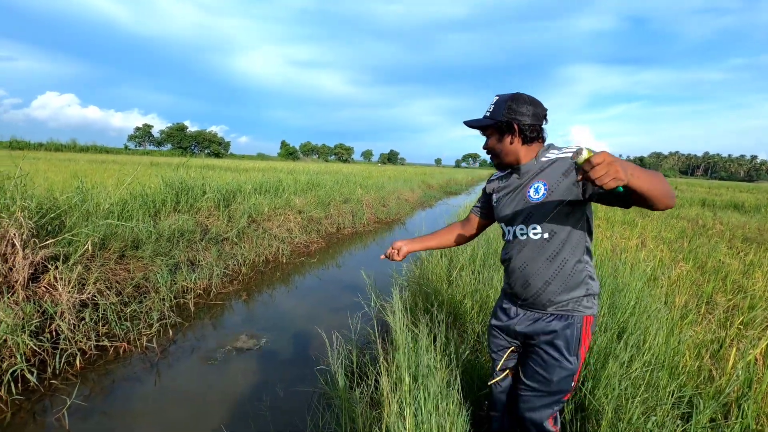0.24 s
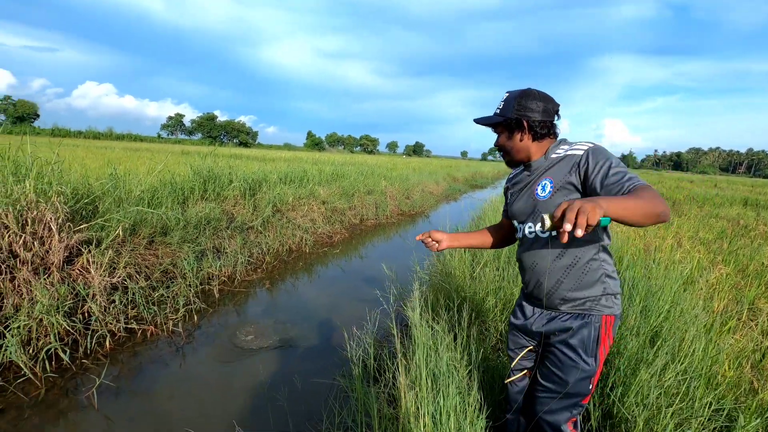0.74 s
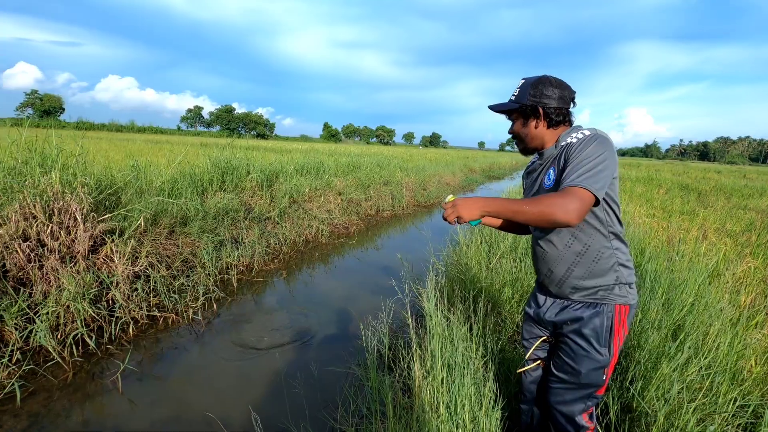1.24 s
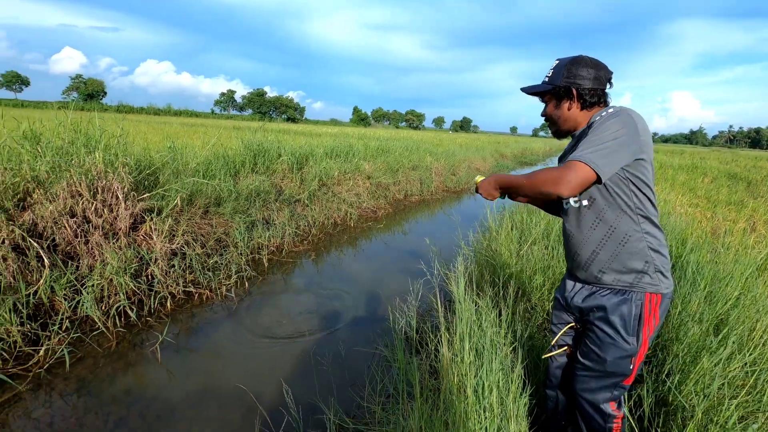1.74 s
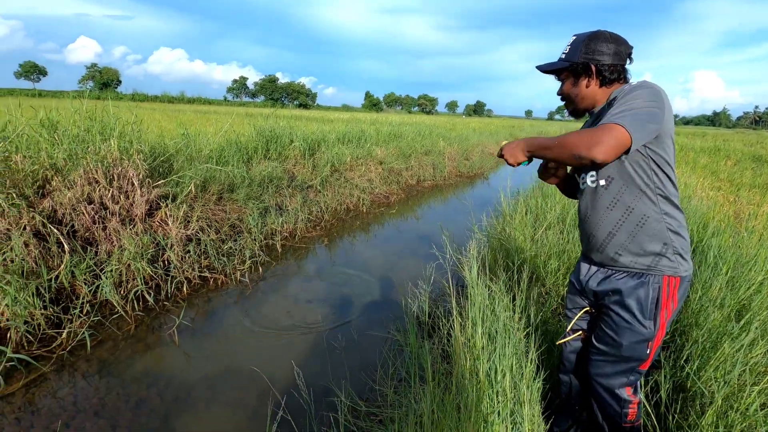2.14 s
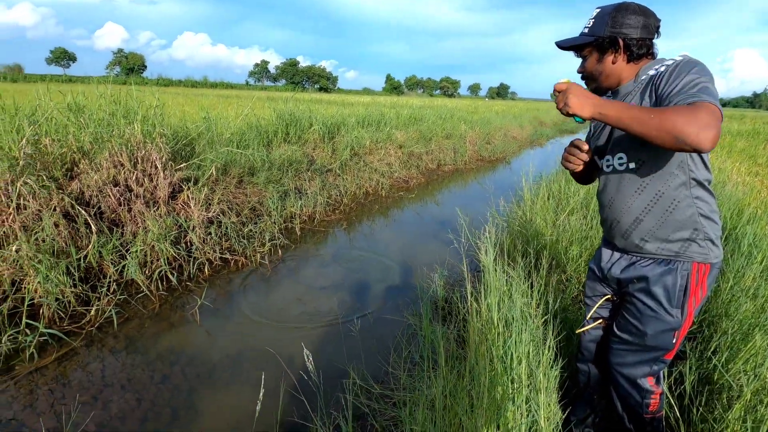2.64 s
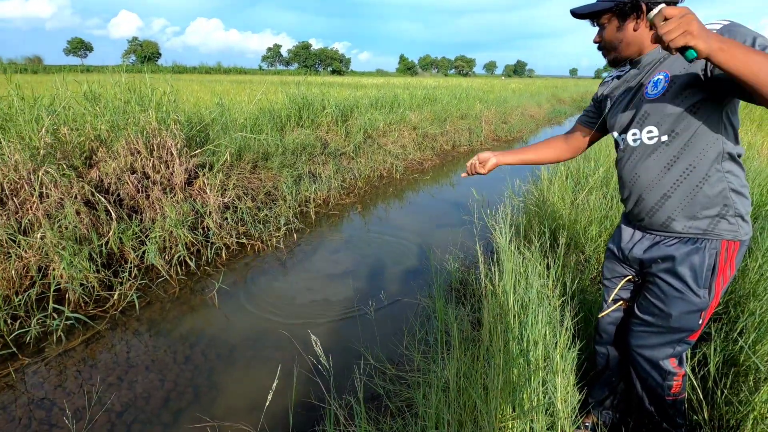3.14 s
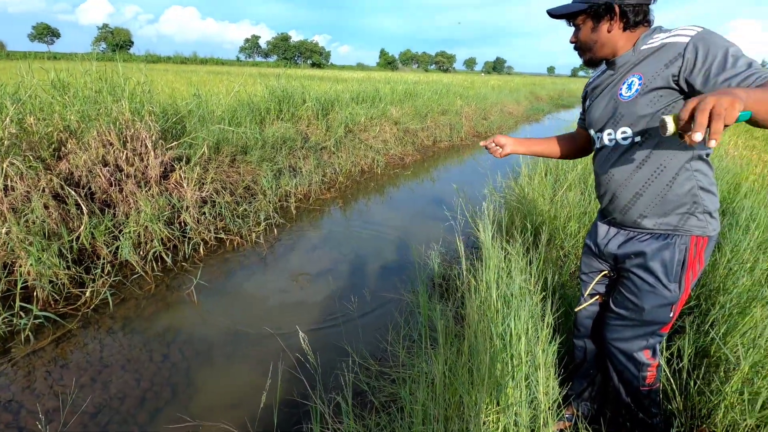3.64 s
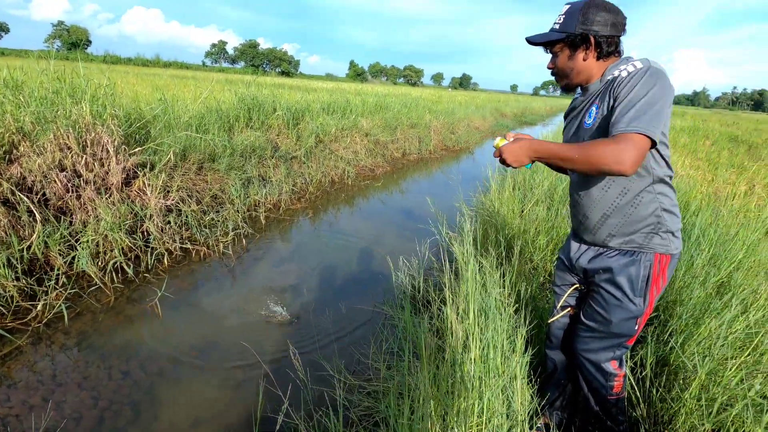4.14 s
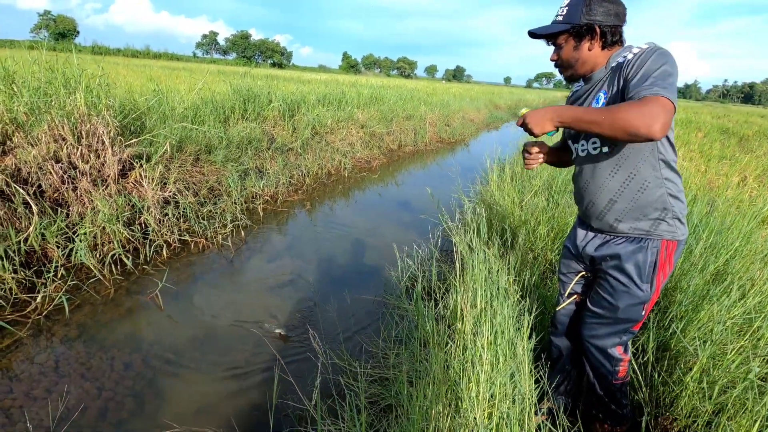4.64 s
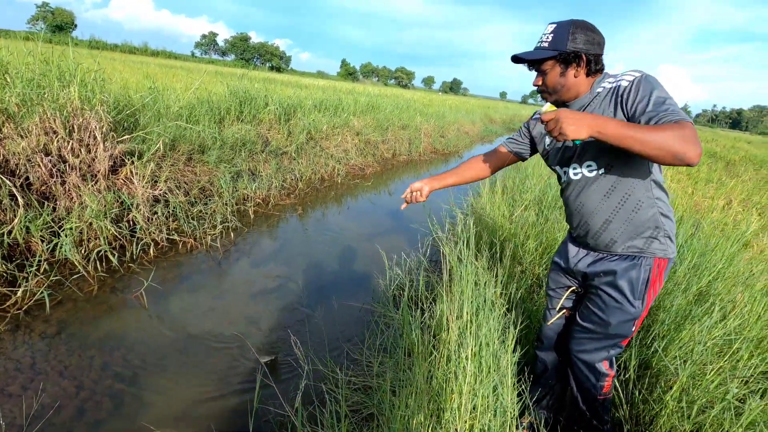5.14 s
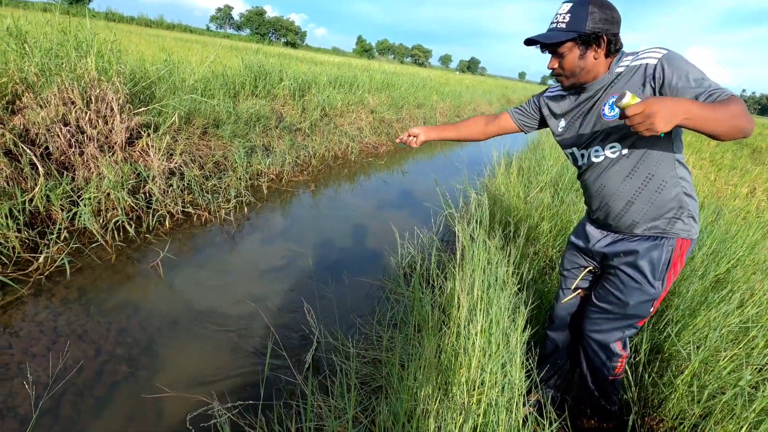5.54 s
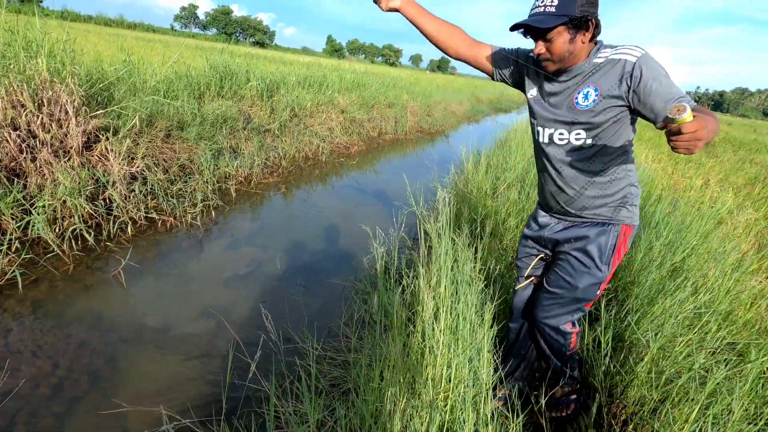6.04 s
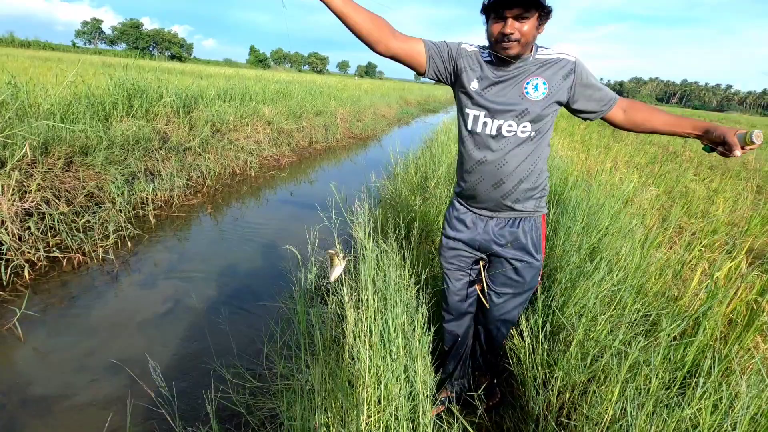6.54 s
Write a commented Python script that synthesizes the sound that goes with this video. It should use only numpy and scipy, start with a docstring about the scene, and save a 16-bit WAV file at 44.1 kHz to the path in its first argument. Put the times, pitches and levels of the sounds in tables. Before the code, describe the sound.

An open paddy field, heard by a stereo microphone near a ditch: a quiet distant wash and a thin, buzzing high insect hiss throughout. From 0 to 0.9 s a line dragged through water swishes and splashes, with ringing bubbles, rising gulps and bright drop ticks, the sharpest around 0.5 s. A low hum throbs unevenly beneath until about 2.5 s. A faint whistle comes at 1.4 s; from 1.5 s a distant warbler repeats a rapid five-note gliding chirp roughly every 0.3 s, growing clearer. Another bird trills at 2.2 s. From 2.6 s wind rumbles and flutters, slapping one side or the other, with dense jolts at 3.4-4 s and a heavy thump near 4.5 s. A smaller splash gurgles and drips at 3.9-4.8 s. Light wet swishes and ticks follow near 5.5-6.6 s, then a brief whistle and a short, hollow, raspy frog croak from 6.6 s to about 6.8 s.

```python
"""A low hum throbs under a hissing band of insects and the far wash of an open paddy field, while a line pulled
through a ditch splashes: noise swishes, ringing bubbles, gliding gulps, ticking drops. From 1.5 s a warbler
repeats a five-note phrase of gliding tones; other birds whistle briefly near 1.4, 2.2 and 6.6 s. From 2.6 s
wind buffets the two microphone ports with low noise and single jolts; the line splashes again near 4 s.
At the end a frog croaks: noisy pulses through throat resonances."""
import sys
import numpy as np
from scipy import signal
from scipy.fft import rfft, irfft, next_fast_len
from scipy.io import wavfile
from scipy.ndimage import uniform_filter1d

SR = 44100
rng = np.random.default_rng(int(sys.argv[2]) if len(sys.argv) > 2 else 0)


def output_pcm(signal):
    """Save a mono or channel-first signal as 16-bit PCM at the path in sys.argv[1].

    Samples are clipped to [-1, 1] before scaling.
    """
    pcm = np.clip(np.atleast_2d(signal).T, -1, 1) * 32767
    wavfile.write(sys.argv[1], SR, np.round(pcm).astype(np.int16))


N = 299781  # samples
BIN_HZ = np.fft.rfftfreq(1024, 1 / SR)[:, None]
FRAME_S = np.arange(N // 256 + 5) * 256 / SR

# Phase between the ports for field and water. Each row: frequency in Hz, lead of the left port in radians.
PORT_LEAD = [(60, 0.03), (130, -0.7), (350, -0.76), (1500, -0.73), (3000, -0.4), (6000, -1), (15000, -2)]
# Level between the ports for field and water. Each row: frequency in Hz, left minus right in dB.
PORT_LEAN = [(60, 4.4), (190, 0.89), (500, 0.14), (1000, 1.55), (2200, 4.1), (3700, 4.9), (6000, 0.76),
             (12000, 0.46)]


def gain_of(db):
    """Decibels to amplitude."""
    return 10 ** (np.asarray(db) / 20)


def evened(x, axis=None):
    """Scales to rms 1."""
    return x / np.sqrt(np.mean(abs(x) ** 2, axis=axis, keepdims=True) + 1e-20)


def read(points, hz):
    """Reads a table on a log-frequency axis."""
    f, value = np.transpose(points)
    return np.interp(np.log(hz + 1), np.log(f + 1), value)


def add(mix, start_s, sound):
    """Mixes a sound in at start_s."""
    part = mix[round(start_s * SR):][:len(sound)]
    part += sound[:len(part)]


def smoothed_twice(x, size, axis=-1):
    """Two passes of a moving average."""
    return uniform_filter1d(uniform_filter1d(x, size, axis=axis), size, axis=axis)


def filtered(x, gain):
    """Multiplies the spectrum of x by gain(Hz)."""
    size = next_fast_len(N + 1024)
    spectrum = rfft(x, size) * gain(np.fft.rfftfreq(size, 1 / SR))
    return irfft(spectrum, size)[..., :N]


def coloured(x, points):
    """Gives x the spectrum of a (Hz, dB) table, at rms 1."""
    return evened(filtered(x, lambda hz: gain_of(read(points, hz))))


def resonate(x, hz, width_hz):
    """A resonance of gain 1: shifts hz to 0, applies two one-pole low-passes, shifts back."""
    turn = np.exp(2j * np.pi * hz * np.arange(len(x)) / SR)
    r = np.exp(-np.pi * width_hz / SR)
    return 2 * (turn * signal.lfilter([(1 - r) ** 2], [1, -2 * r, r * r], x / turn)).real


def drift(per_s):
    """Random wander of rms 1: 24 sines of random phase, up to per_s wiggles a second."""
    hz = np.geomspace(per_s / 20, per_s, num=24)[:, None]
    coarse_s = np.arange(0, N + 64, 64) / SR
    wiggle = (np.sin(2 * np.pi * (hz * coarse_s + rng.random(hz.shape))) / np.sqrt(hz)).sum(0)
    return np.interp(np.arange(N) / SR, coarse_s, evened(wiggle))


def noise(size, same, patchy_db):
    """Two channels of random short-time spectra of magnitude size and likeness same, with drifting patches."""
    a, b, c, d, patches = rng.standard_normal((len(FRAME_S), len(BIN_HZ), 5)).T
    patches = uniform_filter1d(patches, size=12, axis=0)  # over frequency
    patches = evened(uniform_filter1d(patches, size=10, axis=1))  # over time
    same = np.clip(same, -1, 1)
    left = a + 1j * b
    right = same * left + np.sqrt(1 - same ** 2) * (c + 1j * d)
    z = np.array([left, right]) * gain_of(patchy_db * patches)
    sound = signal.istft(z * evened(size, axis=0), nperseg=1024, noverlap=768)[1]
    return sound[:, :N] / np.sqrt(len(BIN_HZ))


def swells(t, peak_s, db, rise_s, fall_s, dome=1):
    """One envelope a row: 20 dB up over rise_s to its peak, 20 dB down over fall_s; signs of times ignored."""
    late = t - np.asarray(peak_s)[:, None]
    span = np.where(late < 0, np.asarray(rise_s)[:, None], np.asarray(fall_s)[:, None])
    drop_db = 20 * (abs(late) / (abs(span) + 0.00092)) ** dome
    return gain_of(np.asarray(db)[:, None] - np.minimum(drop_db, 200))


def summed(rows):
    """Adds envelopes by power and reads them at every sample."""
    return np.interp(np.arange(N) / SR, FRAME_S, np.sqrt((rows ** 2).sum(0)))


def random_hits(per_s, spread_db):
    """Sparse impulses at random times, with random levels up to 3 * spread_db."""
    level = gain_of(spread_db * np.minimum(rng.exponential(1, N), 3))
    return level * (rng.random(N) < per_s / SR)


def ports(x, lead, lean):
    """A source reaches the two ports with another phase and level, split evenly between them."""
    def gain(hz):
        half = gain_of(read(lean, hz) / 2) * np.exp(.5j * read(lead, hz))
        return half ** [[1], [-1]]
    return filtered(x, gain)


def scatter(x, t60_s):
    """Sparse echoes off banks and stems, other ones for each port."""
    taps = np.zeros((2, SR // 2))
    at = np.arange(300, SR // 2 - 20, 20) + rng.integers(0, 20, (2, (SR // 2 - 301) // 20))
    np.put_along_axis(taps, at, rng.choice([-1., 1.], at.shape), 1)
    taps *= gain_of(-60 * np.arange(SR // 2) / SR / t60_s)
    return signal.fftconvolve(x[None], taps / np.linalg.norm(taps[0]), axes=1)[:, :N]


def field():
    """Steady far wash and leaves as shaped noise; insects as narrow noise that buzzes fast, throbs slowly."""
    # Each row: frequency in Hz, spectrum in dB per Hz.
    wash_spectrum = [(8.2, -51), (14, -17), (30, -16), (45, -3), (69, -4.5), (127, -10), (157, -12),
                     (291, -26.5), (607, -43), (1090, -40.5), (1430, -39.5), (2030, -39), (5700, -47.5),
                     (8860, -42), (16000, -126)]
    # Each row: frequency in Hz, left-right likeness 0-1.
    wash_likeness = [(60, 1), (130, 0.83), (300, 0.55), (700, 0.052), (3000, 0.074), (8000, 0.15),
                     (15000, 0.044)]
    wash_db = -50  # of the part above 130 Hz, ahead of the ports
    insect_hz, insect_width_hz, insect_db = 8960, 810, -63.5
    flat = np.ones((len(BIN_HZ), len(FRAME_S)))
    wash = coloured(noise(flat, read(wash_likeness, BIN_HZ), patchy_db=2.0), wash_spectrum)
    above = signal.sosfilt(signal.butter(2, 130, "high", fs=SR, output="sos"), wash)
    buzz = 1 + 0.16 * np.sin(2 * np.pi * np.cumsum(122 + 4 * drift(1.1)) / SR)
    throb = 1 + .2 * np.sin(2 * np.pi * np.cumsum(8.1 + .8 * drift(1.5)) / SR)
    a, b = [evened(resonate(v, insect_hz, insect_width_hz)) for v in rng.standard_normal((2, N))]
    hiss = np.array([a, 0.82 * b - 0.3 * a])  # the ports hear the swarm partly in opposite phase
    insects = gain_of(insect_db + np.array([[3.5], [-3.5]])) * hiss * buzz * throb
    return ports(wash * gain_of(wash_db) / np.std(above), PORT_LEAD, PORT_LEAN) + insects


def hum():
    """A low sine that wavers in pitch and throbs in level."""
    # Each row: peak in seconds, peak level in dB, mean pitch in Hz, seconds to rise and to fall by 20 dB.
    throbs = [(0.178, -39.5, 64.9, -0.46), (.35, -31, 62, 0.04), (.55, -35, 65.96, 0.15),
              (0.729, -31.5, 62.1, 0.05), (.82, -35, 62.5, 0.1), (0.944, -30, 60.2, 0.03),
              (1.06, -44, 66, 1.1), (1.18, -28, 66.64, 0), (1.3, -46.5, 66.14, 1.4), (1.5, -56, 58.4, -2),
              (1.635, -40.5, 61, -0.33), (1.74, -37, 59.5, -0.26), (1.9, -42, 61.9, 0.1),
              (2.07, -58.5, 62.3, 3), (2.24, -44.5, 59.6, 0.15), (2.319, -32.5, 63.8, 0.04),
              (2.53, -32.5, 58.9, 0.04)]
    s, db, hz, span_s = np.transpose(throbs)
    wavering_hz = np.interp(np.arange(N) / SR, s, hz) + 7 * drift(16)
    tone = np.sin(2 * np.pi * np.cumsum(wavering_hz) / SR)
    return np.sqrt(2) * summed(swells(FRAME_S, s, db, span_s, span_s)) * tone


def swish():
    """Grass and water: noise with a body and a hiss a swish; fine droplets crackle in it where water splashes."""
    # Each row: peak in seconds, peak level in dB, seconds to rise by 20 dB, seconds to fall by 20 dB,
    # body centre in Hz, body width in octaves, hiss over body in dB, droplet crackle 0-1.
    swishes = [(.03, -47.5, 4, 0.66, 2000, 0.93, -1, 0.16), (.288, -48, 0.14, -0.26, 1170, 0.73, -12, 0.1),
               (.55, -52, 1.2, 0.32, 1800, 1, -7, 0.3), (.87, -62, 1, 1.2, 1480, 0.53, -25, 0),
               (2.76, -64, 0.5, 0.5, 1370, 0.84, -16, 0.45),
               (3.3, -59.5, 0.16, 1.3, 1340, 0.98, -0.5, 0.47), (3.52, -50, 0.19, 0.3, 1060, 0.78, 0, .1),
               (3.96, -54.5, 0.21, -1.3, 1350, 0.68, -9, 0.75),
               (4.15, -53, 0.02, 0.08, 2030, 0.77, -11, 0.6),
               (4.337, -47.5, 0.07, 0.1056, 1540, 1, -1, 0.7), (4.47, -57, 0.03, 0.56, 1510, 1, -2.5, 0.7),
               (4.58, -56.5, 0.2, 0.07, 2570, .25, -15, 0.5), (4.77, -55, 0, 0.16, 2510, 0.27, -15, 0.6),
               (4.808, -54.5, 0.25, 0.32, 1190, 0.58, -0.5, 0.2), (5.0, -62, 0, 0.3, 1270, 0.44, -21, 0.36),
               (5.944, -51, 0, 0.8, 2640, 0.73, -9, 0.3), (6.05, -50.5, 0.23, 0.36, 2090, 0.38, -13, 0.1),
               (6.3, -61, 0.58, 0.5, 2070, 1, 7, 0.5), (6.68, -60.5, 1.1, 0, 1500, 0.76, 1, 0.7),
               (5.58, -66, 0.3, 0.4, 1400, .3, -20, 0.7)]
    # Each row: frequency in Hz, hiss spectrum in dB per Hz.
    hiss_spectrum = [(880, -2.5), (1500, -2), (1720, -47), (2140, -4.5), (3480, 5), (8310, -2), (9640, -5),
                     (13900, -16.5), (16000, -24)]
    s, db, rise_s, fall_s, centre_hz, octaves, hiss_db, wet = np.transpose(swishes)
    power = swells(FRAME_S, s, db, rise_s, fall_s, dome=1.09) ** 2  # dome 1 = pointed, 2 = domed
    bell = np.exp(-(np.log2((BIN_HZ + 1) / centre_hz) / octaves) ** 2)
    body = evened(bell / (1 + (950 / (BIN_HZ + 1)) ** 8), axis=0)
    hiss = gain_of(hiss_db) * evened(gain_of(read(hiss_spectrum, BIN_HZ)))
    size = np.sqrt((body + hiss) ** 2 @ power)
    drops = random_hits(per_s=300, spread_db=4.5)
    crackle = evened(signal.lfilter([1], [1, -np.exp(-1 / (.001 * SR))], drops))  # 1 ms decay
    t = np.arange(N) / SR
    wetness = np.clip(wet, 0, 1) @ power / power.sum(0)
    grain = 1 + np.interp(t, FRAME_S, wetness) * crackle
    alike = read([(1000, 0.88), (4000, 0.49), (7000, 0.75), (12000, 0.28)], BIN_HZ)
    level = np.interp(t, FRAME_S, np.sqrt((size ** 2).mean(0)))
    return noise(size, alike, patchy_db=1) * grain * level


def ticks():
    """Drops tick on water and stems: a bright resonant crack and a dull slap, from one noise burst."""
    # Each row: start in seconds, crack peak in dB, crack centre in Hz, slap over crack in dB.
    drops = [(0.051, -47, 2550, 2), (0.1577, -32, 2620, -21), (0.207, -33.5, 2280, -19),
             (0.25, -33, 7700, -15), (0.305, -32.5, 2870, -19), (0.3324, -34, 5840, -12),
             (.3691, -41, 6900, -15), (.388, -41, 7760, -14.5), (.404, -43, 6500, -15),
             (0.4356, -33, 6900, -24), (0.5266, -14, 3230, -5), (.479, -42, 3000, -11),
             (0.5368, -32, 2580, -1), (0.5854, -20.5, 2730, -43), (0.6525, -32, 2700, -15),
             (0.6818, -40, 3800, -19), (0.843, -45, 5200, -12), (3.868, -33.5, 4550, -4.5),
             (3.9297, -36, 4600, -19), (3.984, -33.5, 5670, -18), (4.0785, -34.5, 1900, 2),
             (4.111, -41, 2400, -20), (4.138, -32, 2400, -25), (4.188, -33, 2700, -22),
             (4.296, -37, 2500, -12), (4.404, -36, 2100, -3), (4.47, -42, 1700, -1.5),
             (4.509, -45, 2000, -3), (4.121, -30, 3400, -30), (4.123, -32, 7000, -28),
             (4.131, -48, 6500, -30), (4.208, -39, 5080, 4), (4.283, -31, 3970, -13),
             (4.2994, -35, 5100, -26), (4.31, -40, 5480, 8), (4.331, -25, 2430, -31),
             (4.332, -30, 4400, -30), (4.331, -35, 8800, -30), (4.337, -32.5, 6700, -30),
             (4.348, -46, 8000, -20), (4.409, -41, 7440, -18), (4.4248, -35.5, 3660, -4),
             (4.517, -45, 2500, -10), (4.6274, -47.5, 1700, 4), (4.789, -43.5, 1980, 4.5),
             (5.5393, -45, 4440, -30), (5.541, -41.5, 3000, -29), (5.8194, -57, 2730, -9),
             (5.873, -50.5, 2830, -22.5), (6.4502, -40, 2900, -5.5), (6.4972, -43.5, 3630, -1),
             (6.579, -48, 3870, -16), (6.5854, -52, 1400, -3), (6.649, -36, 3660, -22),
             (6.6497, -41, 5600, -25)]
    t60_s, shorter = 0.015, 0.27  # t60 at 3 kHz; higher ticks die sooner by this power of pitch
    out, t = np.zeros(N), np.arange(4000) / SR
    for (s, db, hz, slap_db), grit in zip(drops, rng.standard_normal((len(drops), len(t)))):
        decay = gain_of(-60 * t / t60_s * (hz / 3000) ** shorter)
        burst = grit * decay * (1 - np.exp(-t / 0.00064))
        crack = resonate(burst, hz, 0.37 * hz) + 0.16 * resonate(burst, 3700, 3900)
        slap = resonate(burst, 1245, 680)
        add(out, s, gain_of(db) * (crack / abs(crack).max() + gain_of(slap_db) * slap / abs(slap).max()))
    return out


def patter():
    """Showers of fine drops after a splash, each a tick of two or three cycles."""
    # Each row: peak in seconds, peak level in dB, seconds to rise by 20 dB, seconds to fall by 20 dB.
    showers = [(.3, -50, 0.1, .5), (.55, -53, .2, 0.28), (3.98, -59.5, 0.26, 0), (4.15, -52.5, .08, 0.24),
               (4.33, -50.5, 0.2, 0.38), (4.8, -58, 0, 0.46)]
    t, out = np.arange(400) / SR, np.zeros(N)
    hits = random_hits(per_s=220, spread_db=4.5)
    kind = rng.integers(0, 12, N)
    for k, hz in enumerate(np.geomspace(1300, 7000, num=12)):
        u = t * hz / 1.06  # time in units of the ring
        tick = u * np.exp(-u) * np.sin(2 * np.pi * hz * t)
        out += signal.oaconvolve(hits * (kind == k), tick)[:N]
    return summed(swells(FRAME_S, *np.transpose(showers))) * evened(out)


def bubbles():
    """Single bubbles ring and rise in pitch as they near the surface."""
    # Each row: start in seconds, peak level in dB, starting pitch in Hz.
    rings = [(.162, -35.5, 945), (.209, -24.5, 615), (.22, -27, 690), (.233, -26.5, 657),
             (0.247, -27, 1490), (.26, -26.5, 980), (.268, -26.5, 926), (.279, -34, 641),
             (.315, -32.5, 1920), (0.353, -37, 854), (.364, -35, 673), (.375, -35, 1470), (.395, -26, 1420),
             (.165, -39, 1600), (.18, -42, 1950), (.292, -38, 1730), (.297, -40, 560), (.316, -38, 1420),
             (.336, -38, 2150), (.355, -39, 1950), (.41, -35, 2300), (.412, -40, 756), (0.428, -42, 1000),
             (.456, -39, 1050), (.51, -38, 2900), (.594, -42, 1000), (.474, -37.5, 620), (.518, -26, 1180),
             (0.524, -22.5, 2076), (.53, -36, 558), (.632, -36, 1450), (.759, -49, 1920),
             (0.813, -44, 2500), (0.835, -48.5, 1750), (.842, -44.5, 1200), (0.906, -48, 1410),
             (3.856, -39.5, 660), (3.943, -41, 1430), (3.968, -43, 1080), (3.986, -40, 1236),
             (4.017, -42, 1930), (4.131, -33, 2600), (4.139, -35, 2120), (4.153, -37, 1335),
             (4.163, -41, 2300), (4.189, -26, 2056), (4.195, -34.5, 552), (4.252, -38, 2230),
             (4.21, -40, 1900), (4.224, -44, 630), (4.228, -43, 1100), (4.318, -35, 904),
             (4.346, -46, 1760), (4.405, -42, 950), (4.264, -37.5, 663), (4.279, -46, 885),
             (4.294, -52, 577), (4.313, -28, 1830), (4.34, -30.5, 643), (4.349, -33.5, 783),
             (4.354, -30, 923), (4.362, -33.5, 720), (4.379, -40, 840), (4.399, -36.5, 1540),
             (4.47, -40, 1150), (4.508, -45.5, 1200), (4.548, -40, 1510), (4.838, -48, 1050),
             (5.05, -48.5, 1120)]
    cycles, longer = 28.4, 0.65  # cycles to die by 60 dB at 1500 Hz; lower ones ring longer by this power
    rise_per_s = 7.45  # share of the starting pitch
    out, t = np.zeros(N), np.arange(4000) / SR
    ripples = evened(uniform_filter1d(rng.standard_normal((len(rings), len(t))), size=60, axis=1))
    for (s, db, hz), ripple in zip(rings, ripples):
        t60_s = cycles / 1500 * (1500 / hz) ** longer
        turns = hz * (t + rise_per_s * t * t / 2)
        swell = gain_of(-60 * t / t60_s) * (t / t60_s) ** 0.71 * (1 + 0.3 * ripple)  # ragged
        add(out, s, gain_of(db) * swell / swell.max() * np.sin(2 * np.pi * turns))
    return out


def gurgle():
    """Churned water: swarms of small bubbles of all sizes, each a few rising cycles."""
    # Each row: peak in seconds, peak level in dB, seconds to rise by 20 dB, seconds to fall by 20 dB.
    gurgles = [(.22, -43.5, 0.04, 0.53), (.42, -50, 0.36, 0.28), (.54, -41.5, 0.12, 0.0361),
               (3.99, -59, .12, 0), (4.2, -48.5, -0.15, 0.2), (4.32, -44.5, 0, 0.17)]
    t, out = np.arange(1500) / SR, np.zeros(N)
    hits = random_hits(per_s=1200, spread_db=4.0)
    kind = rng.integers(0, 16, N)
    for k, hz in enumerate(np.geomspace(540, 3400, num=16)):
        u = t * hz / 2.7  # time in units of the ring
        tone = np.sin(2 * np.pi * hz * t * (1 + 0.04 * rng.random() * u))
        blip = u * np.exp(-u) * tone * gain_of(-3 * np.log2(hz / 1300) ** 2)
        out += signal.oaconvolve(hits * (kind == k), blip)[:N]
    return summed(swells(FRAME_S, *np.transpose(gurgles))) * evened(out)


def gulps():
    """Air pockets close in the splash: ragged tones that glide, mostly up, as each pocket shrinks."""
    # Each row: start in seconds, length in seconds, first pitch in Hz, last pitch in Hz, level in dB.
    pockets = [(0.271, 0.069, 1800, 2205, -50.5), (0.51, 0.023, 702, 2280, -39.5),
               (3.94, .03, 1150, 1600, -55), (3.974, .035, 1050, 1700, -51), (4.009, .03, 1500, 2100, -56),
               (4.252, 0.016, 2200, 2900, -47.5), (4.274, 0.029, 1306, 3020, -47),
               (4.366, 0.045, 801, 2300, -48.5), (4.448, .03, 896, 1400, -50),
               (0.222, 0.03, 907, 1510, -42), (0.345, 0.03, 598, 1110, -44),
               (0.418, 0.018, 810, 1200, -48.5), (4.152, 0.025, 1205, 1500, -51),
               (4.189, 0.045, 478, 650, -50), (4.306, 0.026, 1200, 2000, -46),
               (4.51, .045, 1110, 1550, -60), (4.661, 0.022, 956, 1110, -56),
               (5.481, 0.042, 1060, 1630, -53.5), (5.62, 0.019, 1050, 1450, -59),
               (5.61, 0.041, 1000, 1000, -63), (5.738, .03, 1100, 1200, -63),
               (5.71, .03, 1496, 1200, -55.5)]
    out = np.zeros(N)
    ripples = evened(uniform_filter1d(rng.standard_normal((len(pockets), 8000)), size=80, axis=1))
    for (s, length_s, first_hz, last_hz, db), ripple in zip(pockets, ripples):
        u = np.arange(0, 1, 1 / (max(length_s, .004) * SR))[:8000]
        hz = first_hz * (last_hz / first_hz) ** (u ** 1.46) * (1 + 0.039 * ripple[:len(u)])
        level = np.sin(np.pi * u) * gain_of(db + 3 * ripple[::-1][:len(u)])
        add(out, s, np.sqrt(2) * level * np.sin(2 * np.pi * np.cumsum(hz) / SR))
    return out


def whistle(rows, stretch=1):
    """One near-sine note, soft at both ends; a trill flicks the pitch up while the level dips."""
    s, *columns = np.transpose(rows)
    t = np.arange(s[0], s[-1], 1 / SR)
    hz, db, *trill = (np.interp(t, s, c) for c in columns)
    flick = np.sum(trill, 0) * np.cos(np.pi * 161 * (t - 2.2985)) ** 2  # 161 flicks a second
    tone = np.sin(2 * np.pi * np.cumsum(hz * stretch * (1 + 0.28 * flick ** 2)) / SR)
    return np.sqrt(2) * gain_of(db - 8.1 * flick) * tone * signal.windows.tukey(len(t), .25)


def birds():
    """A far warbler's phrase, each time a little off in pitch and level, and the other birds' whistles."""
    # One table a note of the phrase. Each row: seconds in the phrase, pitch in Hz, dB re phrase level.
    phrase_notes = [
        [(-.001, 6370, -13), (.004, 4975, -2), (.008, 4575, -4), (.013, 4140, -5.5), (.02, 4050, -7)],
        [(.019, 5440, -2), (.024, 4690, -2), (.032, 4128, 4), (.04, 3390, -4), (.047, 3290, -2)],
        [(.047, 4880, -12), (.051, 3900, -3), (.056, 4440, -4), (.061, 4620, 1), (.067, 4420, -8)],
        [(.07, 7290, -3.5), (.08, 6322, 4), (.084, 5750, 6.5), (.088, 4810, 6.5), (.096, 3600, 0),
         (.105, 2600, -12)],
        [(.1, 6800, -21), (.112, 5450, -14), (.119, 5780, -4.5), (.128, 5450, 1.5), (.136, 5155, 2.5),
         (.145, 5030, -5), (.152, 5100, -14)],
    ]
    # Each row: start in seconds, level in dB, lateness of the last note in ms.
    phrases = [(1.554, -56, 0), (1.816, -53.5, 0), (2.102, -49.5, -2.5), (2.379, -48.5, 1),
               (2.678, -50.5, 2), (2.985, -49.5, -1.5), (3.284, -49.5, 2), (3.586, -49, -5.5),
               (3.88, -48, 2.5), (4.165, -47.5, -2), (4.449, -48.5, 3), (4.731, -49.5, 0),
               (5.014, -49, 0.5), (5.305, -50, 2), (5.603, -49.5, -1), (5.904, -49.5, -0.5),
               (6.207, -48.5, 2.5)]
    # One table a note. Each row: time in seconds, pitch in Hz, level in dB, trill depth 0-1.
    whistles = [
        [(2.13, 1590, -62, 0.48), (2.175, 1880, -60, 0.56), (2.195, 1740, -57, 0.4)],
        [(2.194, 2290, -58, 0.), (2.212, 2090, -63, 0.)],
        [(2.168, 3300, -66, 0.), (2.176, 3800, -58, 0.), (2.19, 3568, -56, 0.)],
        [(2.208, 2870, -62, 0.), (2.22, 3806, -55, 0.), (2.228, 3820, -57.5, 0.)],
        [(2.236, 3950, -62, 0.), (2.243, 3460, -48, 0.), (2.255, 3350, -57, 0.), (2.261, 2100, -61.5, 0.),
         (2.266, 3010, -51.5, 0.), (2.276, 3200, -56, 0.4), (2.29, 3324, -48, 0.92), (2.324, 3460, -48.5, 1),
         (2.33, 2940, -52, 0.), (2.338, 2300, -58, 0), (2.352, 2580, -48, 0.), (2.359, 2800, -52, 0.)],
        [(2.358, 1690, -52.5, 0.), (2.371, 2290, -49, 0.28), (2.405, 2360, -52, 0), (2.422, 2300, -67, 0.1)],
        [(1.42, 3920, -61.5, 0.68), (1.447, 3400, -64.5, .8)],
        [(6.551, 2860, -54, 0.), (6.555, 3910, -48, 0.1), (6.561, 4000, -49, 0.), (6.567, 3890, -50, 0.),
         (6.571, 3370, -55, 0.), (6.576, 2900, -60, 0.)],
        [(6.552, 1800, -54, 0.1), (6.578, 1580, -56, 0.)],
        [(6.554, 2200, -58, 0.2), (6.576, 2100, -60, 0.2)],
        [(6.555, 2850, -58, 0.2), (6.572, 2700, -61, 0.2)],
        [(6.742, 4360, -63, 0.1), (6.758, 4050, -55.5, 0.)],
        [(6.766, 4400, -60, 0.), (6.775, 4700, -58, 0.06)],
    ]
    shimmer_db, shimmer_s = 1.6, .004  # moving air makes the far warbler flicker in level
    out = np.zeros(N)
    offs = rng.standard_normal((len(phrases), len(phrase_notes)))
    for (s, db, late_ms), off in zip(phrases, offs):
        for k, (note, o) in enumerate(zip(phrase_notes, off)):
            is_last = k == len(phrase_notes) - 1
            start_s = s + note[0][0] + late_ms / 1000 * is_last
            add(out, start_s, gain_of(db + o) * whistle(note, stretch=1 + 0.0062 * o))
    air = smoothed_twice(rng.standard_normal(N), round(shimmer_s * SR))
    out = out * gain_of(shimmer_db * evened(air))
    for note in whistles:
        add(out, note[0][0], whistle(note))
    return out


def steadied(x):
    """Evens out the slow swells of a noise, so that the gusts dominate its level."""
    power = smoothed_twice(evened(x, axis=1) ** 2, 2200)
    return evened(x / np.sqrt(abs(power) + 0.096), axis=1)


def wind():
    """Turbulence beats on each port in lumps, nearly unrelated: slow pushes and a faster flutter."""
    # Separate thumps. Each row: peak in seconds, peak of the slow push in dB, flutter over push in dB,
    # seconds to rise and to fall by 20 dB, left minus right in dB.
    buffets = [(2.57, -37, -13, 0.64, 11), (2.74, -34, 4, 0.01, 16.5), (2.791, -32, -1.5, 0.06, 16),
               (3.13, -54, -10, -0.5, -0.5), (3.43, -34.5, 3, 0.03, -8), (3.485, -29, -4.5, 0.08, 11),
               (3.665, -40, 1.5, 0.02, 4), (3.725, -39, 9, 0.01, 5), (3.841, -46, 11, -0.04, 12),
               (3.914, -40.5, 5, 0, -8), (3.99, -36, -20, 0.35, 11), (4.09, -30, -15, 0.08, 5),
               (4.19, -29, -18, 0.04, 4), (4.287, -28.5, -16, 0.1, 1), (4.46, -35.5, -12, 0.2, 4),
               (4.552, -23.5, -14, 0.06, -2), (4.678, -30.5, -9, 0.05, 3), (4.89, -31, -4, -0.16, 1),
               (5.01, -35, -11, -0.06, 20), (5.18, -35, -26, 0.43, 10), (5.355, -35, -17, 0.6, 5.5),
               (5.568, -34, -5, 0, 11), (5.72, -41.5, -19.5, 0.65, 14), (5.869, -29.5, -6.5, 0.12, 1.5),
               (5.99, -35, -11, 0, 9.5), (6.235, -35, -20, 0.34, 4.5), (6.33, -32.5, -14, -0.12, 16.5),
               (6.41, -39.5, -17, 0, 15), (6.5, -36, -2, 0, 4), (6.616, -37, -8, 0.3, 5),
               (6.69, -32.5, -3.5, 0.07, 3)]
    # Continuous flutter. Each row: time in seconds, level in dB, left minus right in dB.
    steady_flutter = [(2.4, -57, 4.5), (2.65, -40, 7.5), (2.95, -51, 6), (3.25, -57, -1), (3.6, -35, 6),
                      (3.95, -42.5, 8), (4.3, -46, 2), (4.8, -49, 5), (5.1, -45, 14), (5.6, -56, 1),
                      (6., -50, 1), (6.8, -47.5, 5)]
    # Each row: frequency in Hz, spectrum in dB per Hz.
    buffet_spectrum = [(7.1, -18), (12, -1), (33, 13), (81, 1.5), (150, -12.5), (222, -30), (260, -37.5),
                       (390, -70), (500, -47.5), (650, -51), (1100, -120)]
    t, sides = np.arange(N) / SR, (.5, -.5)
    s, db, flutter_db, span_s, pan_db = np.transpose(buffets)

    def gusts(level_db):
        return np.array([summed(swells(FRAME_S, s, level_db + side * pan_db, span_s, span_s)) for side in sides])

    pushes, flaps = gusts(db), gusts(db + flutter_db)
    flutter_s, steady_db, steady_pan_db = np.transpose(steady_flutter)
    steady = gain_of([np.interp(t, flutter_s, steady_db + side * steady_pan_db) for side in sides])
    flutter = np.hypot(flaps, steady)
    lumps_db = 2.0 * np.array([drift(15), drift(12)])
    left, right = rng.standard_normal((2, N))
    buffet = coloured(np.array([left, 0.25 * left + right]), buffet_spectrum)
    push = signal.sosfiltfilt(signal.butter(2, 60, fs=SR, output="sos"), buffet)
    both = pushes * steadied(push) + flutter * steadied(buffet - push)
    onset = np.clip((t - s[0]) / 0.29, 0, 1)  # silent until the first buffet's peak
    return gain_of(lumps_db) * both * onset


def jolts():
    """A pocket of air slaps one port: a dip, a sharp rise, a trough and a small rebound."""
    # One table a port, left then right. Each row: peak in seconds, peak level in dB, peak to trough in ms.
    slaps = [
        [(2.733, -13.5, 8.5), (2.776, -14.5, 9.9), (3.609, -21.5, 9), (3.671, -15, 5.2), (3.716, -15.5, 5.9),
         (3.73, -13.5, 8.3), (3.76, -17.5, 6.2), (3.804, -20.5, 13), (3.84, -13.5, 5.7), (3.878, -18, 6.3),
         (3.918, -18.5, 4.7), (4.293, -24.5, 9), (4.453, -16.5, 13.3), (4.67, -16.5, 9.8), (5.078, -20, 8),
         (5.354, -17, 9.5), (5.561, -17, 6.7), (5.981, -17.5, 12), (6.337, -22, 9.7)],
        [(3.42, -17.5, 7.8), (3.456, -21.5, 6.8), (3.478, -18, 6), (3.722, -14.5, 7.8), (3.971, -24, 9.7),
         (4.544, -13, 12.2), (5.867, -26, 6.5)],
    ]
    dip, rebound, leak = 0.21, 0.27, 0.13  # leak: share felt by the other port
    out = np.zeros((2, N))
    for port, rows in zip(out, slaps):
        for s, db, swing_ms in rows:
            u = np.arange(-2, 3, 1000 / swing_ms / SR)  # time in swings from the peak
            shape = np.exp(-(u / 0.4) ** 2) - 0.71 * np.exp(-((u - 1) / 0.69) ** 2)
            shape += rebound * np.exp(-((u - 2) / 0.48) ** 2)
            shape -= dip * np.exp(-((u + 1) / .5) ** 2)
            add(port, s - 2 * swing_ms / 1000, gain_of(db) * shape * signal.windows.tukey(len(u), .3))
    return out + leak * out[::-1]


def frog():
    """Uneven pulses with a puff of noise each, through a hollow throat, in short syllables."""
    # One row a syllable: start in seconds, length in seconds, starting level in dB.
    croaks = [(6.608, 0.1, -43), (6.709, 0.031, -45.5), (6.739, 0.033, -44.5), (6.773, 0.025, -47)]
    # Hardest pulses. Each row: time in seconds, peak over the rms of the rattle in dB.
    rasps = [(6.6123, 23.5), (6.62, 25), (6.623, 23), (6.631, 23), (6.648, 24), (6.655, 24), (6.658, 23),
             (6.666, 27), (6.672, 23), (6.675, 23), (6.6945, 25), (6.7138, 27), (6.731, 24), (6.761, 25),
             (6.782, 22)]
    # Resonances. Each row: frequency in Hz, width in Hz, gain in dB.
    throat_modes = [(1150, 210, 0), (1540, 540, 9.5), (1800, 300, 5.5), (2110, 240, 6.5)]
    edge_s, fade_db = 0.0028, -1  # fade_db: change over a syllable
    t = np.arange(croaks[0][0], N / SR, 1 / SR)
    turns = np.cumsum(300 * (1 + .18 * drift(60)[:len(t)])) / SR  # about 300 pulses a second
    puffs = gain_of(1.8 * rng.standard_normal(200))
    pulses = puffs[turns.astype(int)] * np.exp(-(turns % 1) / .07)
    rattle = evened((.06 + pulses) * rng.standard_normal(len(t)))
    s, db = np.transpose(rasps)
    rattle[np.round((s - t[0]) * SR).astype(int)] += gain_of(db)
    throat = sum(gain_of(g) * resonate(rattle, f, w) for f, w, g in throat_modes)
    throat = signal.sosfilt(signal.butter(4, [1050, 2450], "band", fs=SR, output="sos"), throat)
    s, length_s, db = np.transpose(croaks)[..., None]
    edges = np.clip(np.minimum(t - s, s + length_s - t) / edge_s, 0, 1)
    level = (edges * gain_of(db + fade_db * np.clip((t - s) / length_s, 0, 1))).sum(0)
    out = np.zeros(N)
    add(out, t[0], level * evened(throat))
    return out


def scene():
    """Everything at the two ports."""
    # Phase of the birds between the ports. Each row: frequency in Hz, lead of the left port in radians.
    song_lead = [(2000, -1.5), (2900, 0.087), (3750, 0.69), (4800, 0.82), (6200, 0.98)]
    # Level of the birds between the ports. Each row: frequency in Hz, left minus right in dB.
    song_lean = [(2000, 2.1), (2900, 9.1), (3750, 14.3), (4800, 8.2), (6200, 2.3)]
    song = birds()
    splash = bubbles() + ticks() + gurgle() + gulps() + patter()
    near = splash + gain_of(-10.0) * scatter(splash, t60_s=0.051) + swish() + hum() + frog()
    song = song + gain_of(-8.5) * scatter(song, t60_s=0.19)
    at_ports = ports(near, PORT_LEAD, PORT_LEAN) + ports(song, song_lead, song_lean)
    return at_ports + wind() + jolts() + field()


def record(dry):
    """Limits the band with a low-pass at 15.8 kHz."""
    low_pass = signal.firwin(511, 15800, window=("kaiser", 9), fs=SR)
    return signal.oaconvolve(dry, low_pass[None], "same")


dry = scene()
out = record(dry)
output_pcm(out)
```